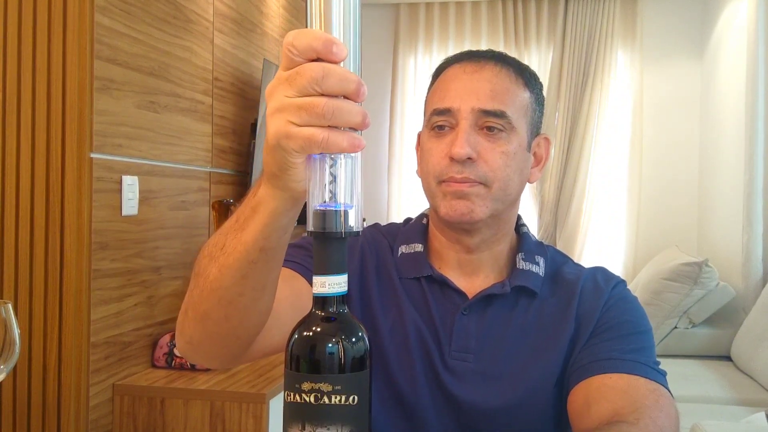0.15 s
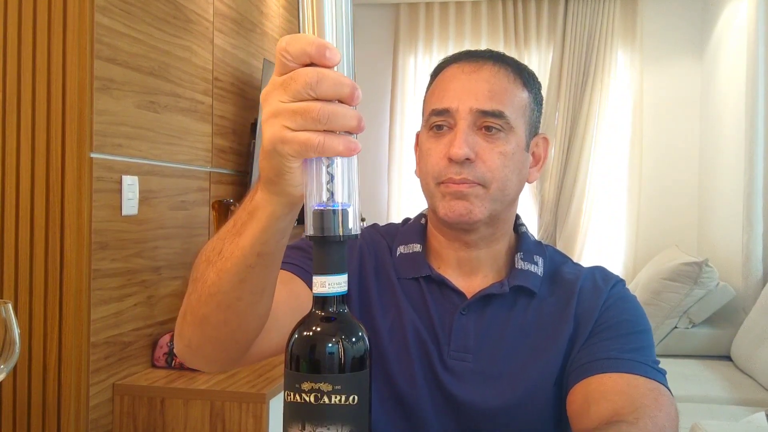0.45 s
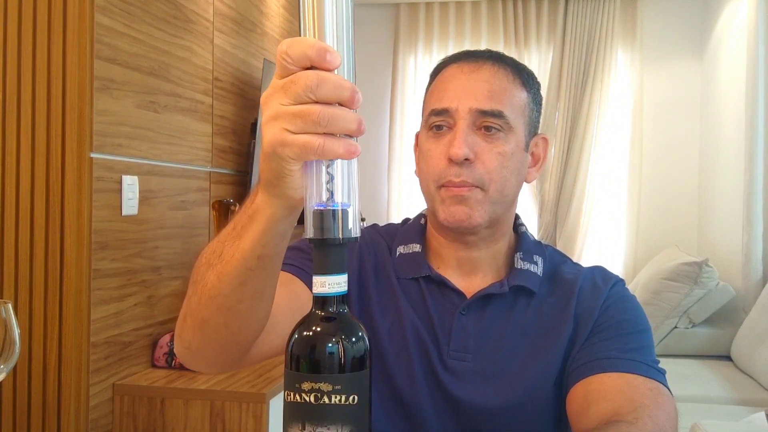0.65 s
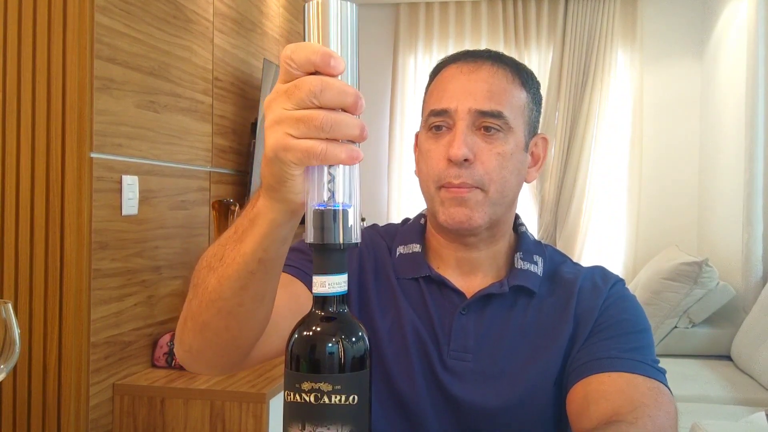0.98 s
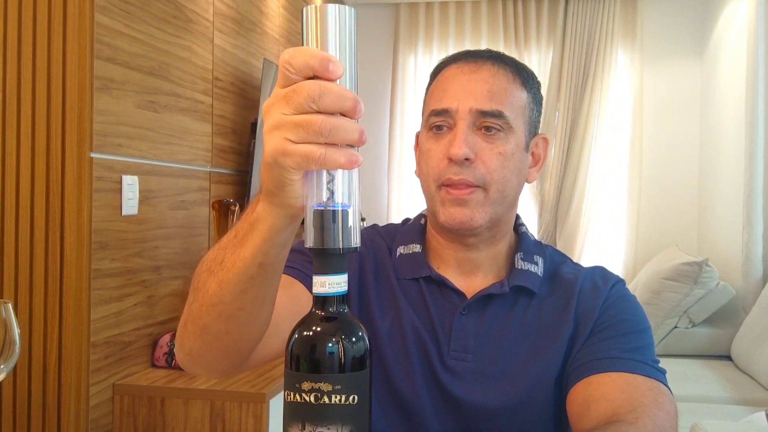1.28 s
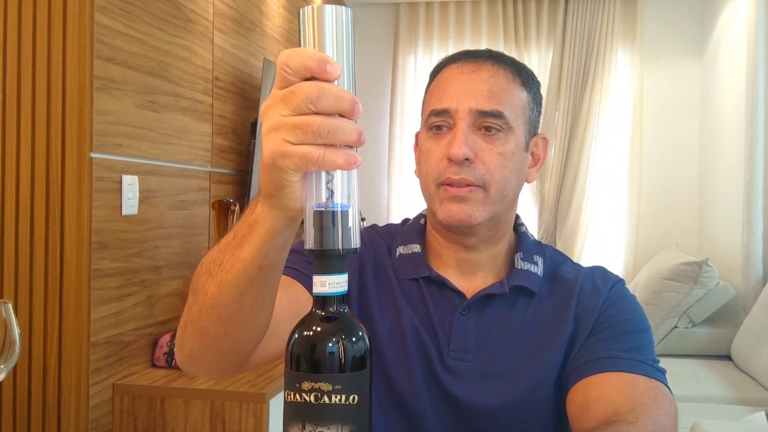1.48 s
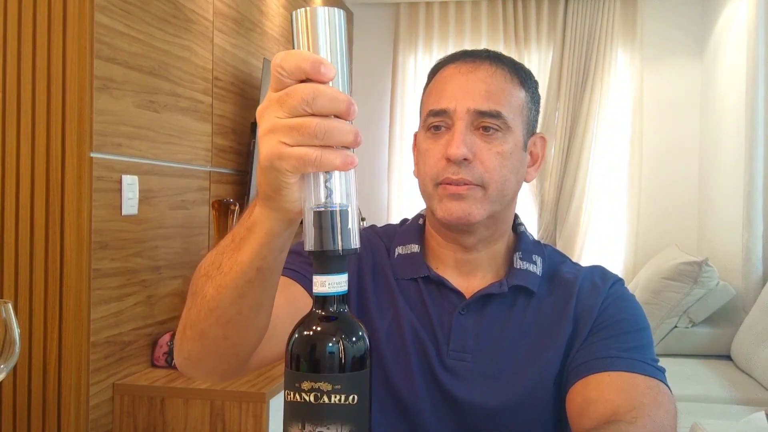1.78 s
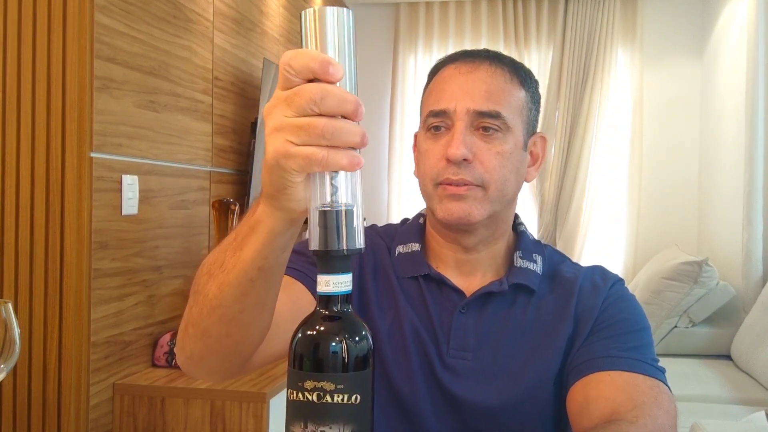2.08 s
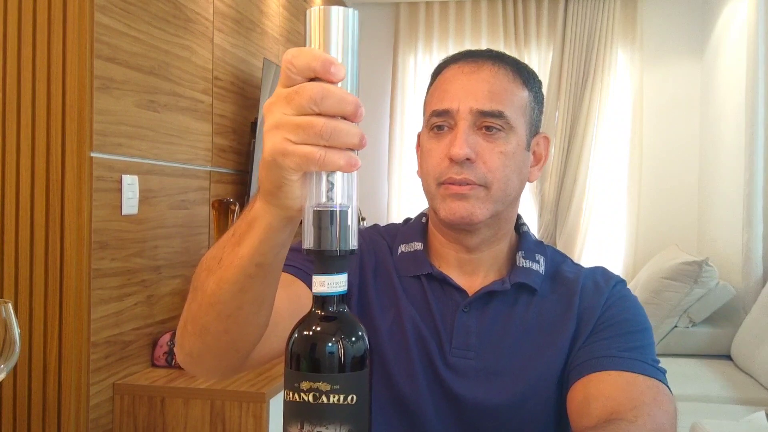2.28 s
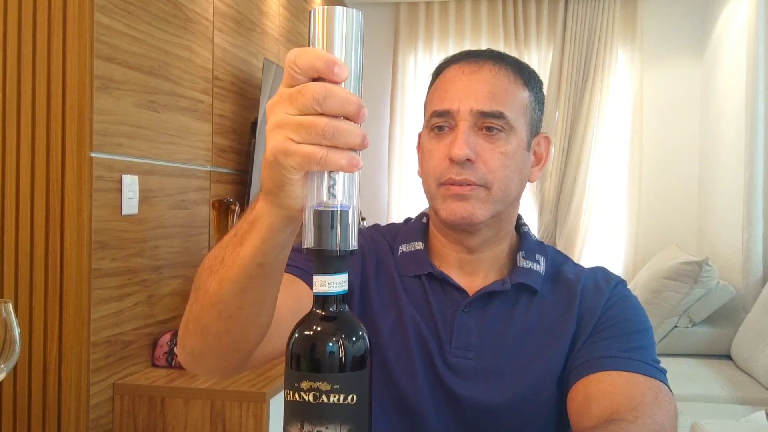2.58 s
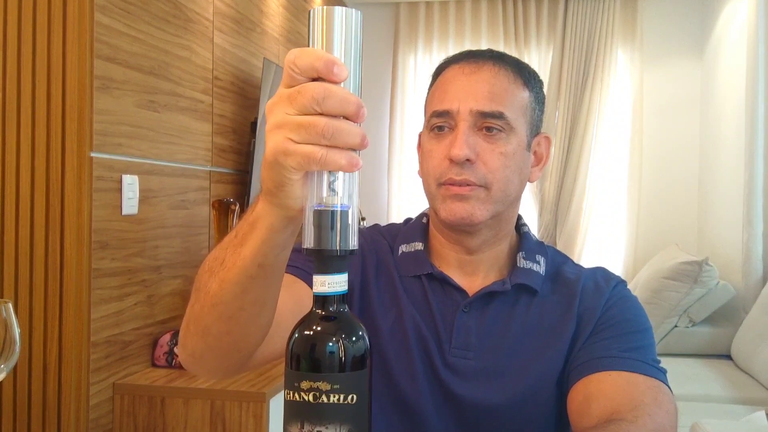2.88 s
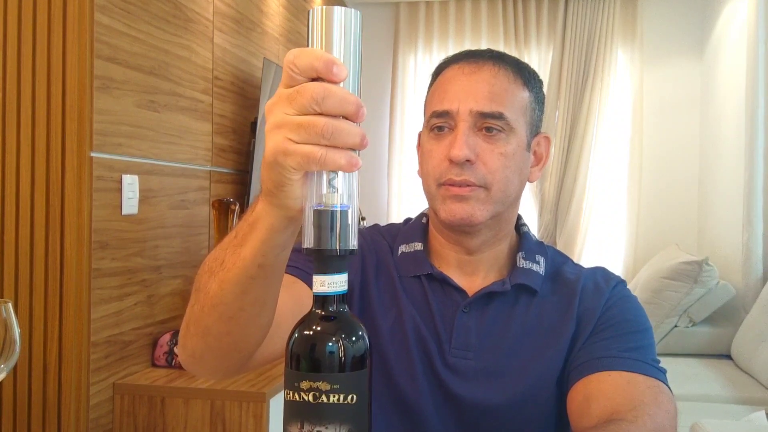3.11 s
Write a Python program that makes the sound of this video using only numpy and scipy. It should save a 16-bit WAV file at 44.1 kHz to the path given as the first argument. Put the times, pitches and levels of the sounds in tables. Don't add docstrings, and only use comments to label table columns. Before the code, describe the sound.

A small electric corkscrew motor whines and hisses, bogs down, snaps a cork loose, then recovers

```python
import sys
import numpy as np
from scipy import signal
from scipy.fft import rfft, irfft
from scipy.io import wavfile
from scipy.ndimage import uniform_filter1d

SR = 44100
rng = np.random.default_rng(int(sys.argv[2]) if len(sys.argv) > 2 else 0)


def undo_db(level):
    steps = np.asarray(level, float) / 20
    return 10 ** steps


def bounce(signal):
    frames = np.transpose(np.atleast_2d(signal))
    limited = np.clip(frames, -1, 1)
    pcm = np.round(limited * 32767).astype(np.int16)
    wavfile.write(sys.argv[1], SR, pcm)


N = 143325

# (time [s], speed [turns/s])
SHAFT_SPEED = [(0, 104.5), (.11, 102), (.39, 99.4), (.49, 95.7), (.56, 95.1), (.72, 97.1), (.9, 101.5),
               (1.15, 101), (1.45, 94.6), (1.57, 93.8), (1.65, 90), (1.82, 73.7), (2.08, 59.5), (2.17, 59),
               (2.27, 73), (2.38, 85), (2.72, 92.6), (3.25, 93)]
# (time [s], hiss level [dB], rattle level [dB])
GEAR_NOISE = [(0, -36, -52), (.15, -33, -50.5), (.35, -31, -50.5), (.55, -32, -48.5), (.75, -31.5, -43),
              (.85, -34, -68), (1.05, -32, -71), (1.2, -31.5, -56), (1.42, -31, -49), (1.55, -36, -111),
              (1.75, -37.5, -81), (1.9, -39.5, -50.5), (2.16, -41.5, -50.5), (2.25, -41.5, -63),
              (2.36, -34.5, -54.5), (2.75, -34.5, -57.5), (3, -35.5, -55), (3.25, -33, -48.5)]
# (time [s], whine level [dB])
WHINE_LEVEL = [(0, -53), (.15, -52), (.33, -50), (.55, -52), (.75, -50), (.85, -52), (1.05, -49),
               (1.25, -49), (1.42, -49), (1.58, -44), (1.75, -51), (1.9, -52), (2.15, -57), (2.245, -42),
               (2.36, -55), (2.78, -48), (3, -51), (3.25, -47)]
# (order [per turn], level against the mesh [dB], gain at full load [dB])
SHAFT_ORDERS = [(6, -20, -50), (7, -25, -10), (8, -18, -40), (10, -25, 0), (11, -22, 10), (12, -20, 0),
                (13, -21, -10), (14, -12, -5), (15, 0, -17), (16, -17, 20), (17, -32, 48), (18, -30, 38),
                (21, -22, -10), (22, -20, -20), (29, -19, 0), (30, -14, 20), (31, -19, 0), (45, -13, 0),
                (60, -13, 0)]
# (frequency [Hz], width [Hz], lift [dB])
TUBE_MODES = [(610, 30, 6), (890, 80, -6), (1015, 45, 8), (1080, 60, 5), (1302, 25, 10), (1585, 30, 10),
              (2050, 300, 3), (2770, 200, -9), (3020, 80, 5), (5575, 60, 7)]
# (frequency [Hz], density [dB per Hz])
HISS_COLOUR = [(350, -17.5), (600, -16), (900, 3.5), (1200, 1), (1900, 0.5), (3000, -1), (5200, -1),
               (6200, 0)]
# (frequency [Hz], width [Hz], lift [dB])
GRIPPED_RINGS = [(2380, 160, 1.5), (2420, 40, 7), (2500, 120, 4), (2930, 240, 3.5), (2980, 150, 6),
                 (3460, 210, 6.5), (3700, 75, -2), (4260, 1260, 6), (5120, 340, -3.5), (5600, 340, -1),
                 (6130, 650, 2), (6860, 310, 1.5), (9650, 59, -4.5)]
# (frequency [Hz], width [Hz], lift [dB])
FREED_RINGS = [(1035, 65, 11), (1730, 750, -1.5), (2130, 550, 7.5), (2660, 35, -13), (2980, 130, -0.5),
               (3050, 100, -13), (3080, 220, 2.5), (3550, 380, 7.5), (3640, 110, -8), (3964, 100, 8),
               (4400, 450, 7), (4920, 280, -7), (5530, 1050, 4), (6810, 460, 4.5)]
# (time [s], crack level [dB], thump level [dB], knock level [dB])
CORK_SLIPS = [
    (1.6638, -25, -61, -39),
    (1.7507, -8, -36.5, -36),
]
# (time after its start [ms], level [dB])
FIBRES = [(.1, -16), (.4, -9), (.85, -2), (1.1, -5), (1.5, -1), (1.85, 0), (2.5, -7), (3.55, -9)]
# (frequency [Hz], density [dB per Hz])
CRACK_COLOUR = [(500, 6.5), (1500, -2), (2300, 10), (3800, 8.5), (6000, 3), (9000, 1), (11500, 14.5),
                (15000, 11.5)]
# (frequency [Hz], level [dB], t60 [s])
BOTTLE_MODES = [(221, -2, .55), (265, -2, .8), (322, -1, .45), (355, -3, .45), (412, -3, .35),
                (506, -14, .25), (570, -17, .2), (813, -14, .12)]
# (frequency [Hz], t60 [s])
ROOM_DECAY = [(200, 0.47), (1000, 0.57), (3000, 0.43), (8000, 0.52), (14000, 0.25)]
# (delay [s], level [dB])
REFLECTIONS = [(.0055, -16), (.0075, -16), (.0102, -12), (.0118, -11), (.016, -16), (.022, -19)]
# (frequency [Hz], density [dB per Hz])
RUMBLE_COLOUR = [(12, -45), (20, 2.5), (103, -10.5), (134, -10), (173, -15.5), (216, -12.5), (309, -14),
                 (700, -22), (910, -85), (1540, -120)]
# (frequency [Hz], left-right likeness [0 to 1])
RUMBLE_LIKENESS = [(25, 0.58), (120, 0.89), (300, 0.75), (700, 0.3)]
# (time [s], level [dB])
DRONE_SWELLS = [(0, -12), (.4, 1), (.5, 12.5), (.72, 10), (.8, -2.5), (1.35, -0.5), (1.45, 9), (1.55, 2.5),
                (3.25, 0.5)]
# (frequency [Hz], response [dB])
LEFT_PORT = [(4000, 0), (8000, 10), (10000, 9.5), (11200, 12.5), (11700, 15), (12400, 6.5), (13300, 0),
             (14300, 7.5)]
# (frequency [Hz], response [dB])
RIGHT_PORT = [(4000, 1), (6500, 10), (8000, 16), (9150, 23), (10100, 12), (11500, 5.5), (12900, -17.5),
              (14300, -10.5)]
# (frequency [Hz], response [dB])
BAND_LIMIT = [(14250, 0), (14400, -27), (15000, -28), (15200, -90)]

DIRECT_LAG_S = 8e-5


def motor():
    hiss_db, rattle_db = curve(GEAR_NOISE)
    speed = uniform_filter1d(curve(SHAFT_SPEED)[0], size=2000)
    shaft_hz = speed * (1 + .0015 * wander(24.7))
    turns = np.cumsum(shaft_hz) / SR
    beat = 1 + 0.092 * np.cos(2 * np.pi * turns)
    tonal = mesh_whine(shaft_hz, turns) + mesh_rattle(shaft_hz, beat, rattle_db)
    return room(tonal, -8, -1, DIRECT_LAG_S) + gear_hiss(beat, hiss_db)


def mesh_whine(shaft_hz, turns):
    free_hz, waver_db = 103, 2.5
    load = 1 - shaft_hz / free_hz
    whine_db = curve(WHINE_LEVEL)[0]
    whine = np.zeros(N)
    for order, db, load_db in SHAFT_ORDERS:
        level_db = whine_db + db + load_db * load + waver_db * wander(3.5)
        level_db = level_db + peaks_db(TUBE_MODES, order * shaft_hz)
        whine += undo_db(level_db) * np.sqrt(2) * np.sin(2 * np.pi * (order * turns + rng.random()))
    return whine


def mesh_rattle(shaft_hz, beat, rattle_db):
    band_hz, width_hz = 488 + 8.58 * shaft_hz, 326
    band = resonate(rng.standard_normal(N), band_hz, width_hz)
    return undo_db(rattle_db) * beat * evened(resonate(band, band_hz, width_hz))


def gear_hiss(beat, hiss_db):
    grain_db, flicker_db, diffuse_db, tail_s = 4, 0.1, 8, 0.021
    grain = beat * undo_db(grain_db * wander(380) + flicker_db * wander(90))
    near, mid, side = rng.standard_normal((3, N))
    direct = np.array([np.roll(near * grain, round(DIRECT_LAG_S * SR)), near * grain])
    diffuse = widen(mid, side) * uniform_filter1d(grain, round(tail_s * SR))
    source = direct + undo_db(diffuse_db) * diffuse
    gripped, loose = housing(source, GRIPPED_RINGS), housing(source, FREED_RINGS)
    hiss = evened(gripped + cork_freed(0.091) * (loose - gripped))
    low = signal.sosfiltfilt(signal.butter(2, 5000, fs=SR, output="sos"), hiss)
    mean_db = hiss_db.mean()
    low_db = mean_db - 4.5 + 0.36 * (hiss_db - mean_db)
    return undo_db(hiss_db - 7.5) * (hiss - low) + undo_db(low_db) * low


def housing(source, rings):
    response_db = read(HISS_COLOUR, bins()) + peaks_db(rings, bins())
    return np.array([colour(v, response_db) for v in source])


def cork_freed(seconds):
    return np.clip((np.arange(N) / SR - CORK_SLIPS[-1][0]) / seconds, 0, 1)


def rub():
    hz, width_hz = 725, 410
    noise = widen(*rng.standard_normal((2, N)))
    band = [resonate(resonate(v, hz, width_hz), hz, width_hz) for v in noise]
    level_db = -57.5 - 11.5 * cork_freed(0.082) + 2.6 * wander(1.8)
    return undo_db(level_db) * evened(np.array(band))


def slips():
    cracks, thumps = np.zeros(N), np.zeros(N)
    for s, crack_db, thump_db, knock_db in CORK_SLIPS:
        at = round(s * SR)
        cracks[at:at + SR] += tube_knock(knock_db) + cork_crack(crack_db)
        thumps[at:at + SR] += bottle_thump(thump_db)
    return room(cracks, -7, 1.5, 2.5e-5) * undo_db(-8.0) + thumps


def cork_crack(level_db):
    rise_s, fall_s, crumble_db = .0015, .001, -20
    t = np.arange(SR) / SR
    envelope = np.minimum(t / rise_s, 1) * np.exp(-np.maximum(t - rise_s, 0) / fall_s)
    clicks = undo_db(crumble_db) * rng.standard_normal(SR) * envelope
    for k, (ms, db) in enumerate(FIBRES):
        clicks[round(ms * SR / 1000)] += (-1) ** k * undo_db(db)
    burst = colour(clicks, read(CRACK_COLOUR, bins()))
    return undo_db(level_db) * burst / np.sqrt(np.mean(burst[:200] ** 2))


def tube_knock(level_db):
    hz, t60_s = 840, 0.094
    t = np.arange(SR) / SR
    return undo_db(level_db - 60 * t / t60_s) * np.sin(2 * np.pi * hz * t)


def bottle_thump(level_db):
    blur_hz, blur_db, boom_db, boom_t60_s, onset_s = 25, -4, 5, 0.2, 0.00067
    t = np.arange(SR) / SR
    ring = np.zeros(SR)
    for hz, db, t60 in BOTTLE_MODES:
        tone = np.sin(2 * np.pi * (hz * t + rng.random()))
        blur = evened(resonate(rng.standard_normal(SR), hz, blur_hz))
        ring += undo_db(db - 60 * t / t60) * (tone + undo_db(blur_db) * blur)
    boom = evened(resonate(resonate(rng.standard_normal(SR), 266, 370), 265, 340))
    boom = undo_db(boom_db - 60 * t / boom_t60_s) * boom
    return undo_db(level_db) * (ring + boom) * (1 - np.exp(-t / onset_s))


def room(x, wet_db, echo_db, lag_s):
    taps = np.zeros((2, SR // 2))
    at = np.arange(200, SR // 2 - 20, 20)
    places = at + rng.integers(0, 20, (2, len(at)))
    np.put_along_axis(taps, places, rng.choice([-1., 1.], (2, len(at))), 1)
    hz, t, z = signal.stft(taps, SR, nperseg=256)
    tail = signal.istft(z * undo_db(-60 * t / read(ROOM_DECAY, hz)[:, None]), SR, nperseg=256)[1]
    response = undo_db(wet_db) * widen(*tail) / np.linalg.norm(tail[0])
    n = np.arange(response.shape[1])
    for s, db in [(0, 0)] + REFLECTIONS:
        skew = lag_s if s == 0 else rng.uniform(-3e-4, 3e-4)
        pulse = np.sinc(n - 30 - SR * np.array([[s + skew], [s]])) * (abs(n - 30 - s * SR) < 60)
        response = response + undo_db(db + echo_db * (s > 0)) * pulse
    return signal.fftconvolve(x[None], response, axes=1)[:, 30:N + 30]


def widen(mid, side):
    same = 1 / (1 + (np.fft.rfftfreq(len(mid), 1 / SR) / 870) ** 2)
    other = same * rfft(mid) + np.sqrt(1 - same ** 2) * rfft(side)
    return np.array([mid, irfft(other, len(mid))])


def air():
    rumble_db, drone_db, drone_hz, drone_width_hz = -51, -62, 129.4, 6.2
    frames, hz = N // 512 + 5, np.fft.rfftfreq(2048, 1 / SR)
    a, b, c, d = rng.standard_normal((frames, 1025, 4)).T
    same = np.clip(read(RUMBLE_LIKENESS, hz), -1, 1)[:, None]
    left = a + 1j * b
    right = same * left + np.sqrt(1 - same ** 2) * (c + 1j * d)
    z = np.array([left, right]) * undo_db(read(RUMBLE_COLOUR, hz))[:, None]
    rumble = evened(signal.istft(z, nperseg=2048, noverlap=1536)[1][:, :N])
    drone = evened(resonate(rng.standard_normal(N), drone_hz, drone_width_hz))
    return undo_db(rumble_db) * rumble + undo_db(drone_db + curve(DRONE_SWELLS)[0]) * drone


def evened(x):
    return x / np.sqrt(np.mean(x ** 2) + 1e-20)


def read(points, hz):
    f, value = np.transpose(points)
    return np.interp(np.log(hz + 1), np.log(f + 1), value)


def curve(table):
    s, *cols = np.transpose(table)
    return [np.interp(np.arange(N) / SR, s, c) for c in cols]


def peaks_db(table, hz):
    return sum(db / (1 + (2 * (hz - f) / w) ** 2) for f, w, db in table)


def bins():
    return np.fft.rfftfreq(4096, 1 / SR)


def colour(x, db):
    log = np.log(undo_db(np.r_[db, db[-2:0:-1]]))
    impulse = np.fft.ifft(np.exp(np.conj(signal.hilbert(log)))).real[:2048]
    return signal.oaconvolve(x, impulse)[:len(x)]


def wander(top_hz):
    hz = np.fft.rfftfreq(N, 1 / SR)
    slow = rfft(rng.standard_normal(N)) * (hz > 0) / (1 + (hz / top_hz) ** 4)
    return evened(irfft(slow, N))


def resonate(x, hz, width):
    turn = np.exp(2j * np.pi * np.cumsum(hz * np.ones(len(x))) / SR)
    r = np.exp(-np.pi * width / SR)
    return 2 * (turn * signal.lfilter([1 - r], [1, -r], x / turn)).real


def scene():
    return motor() + rub() + slips() + air()


def roll_off(x):
    return signal.sosfilt(signal.butter(12, 15060, fs=SR, output="sos"), x)


def record(dry):
    ceiling = 1.05
    ports = [colour(v, read(port, bins())) for v, port in zip(dry, (LEFT_PORT, RIGHT_PORT))]
    limited = [ceiling * np.tanh(v / ceiling) for v in ports]
    mix = np.array([colour(v, read(BAND_LIMIT, bins())) for v in limited])
    return roll_off(mix)


dry = scene()
out = record(dry)
bounce(out)
```